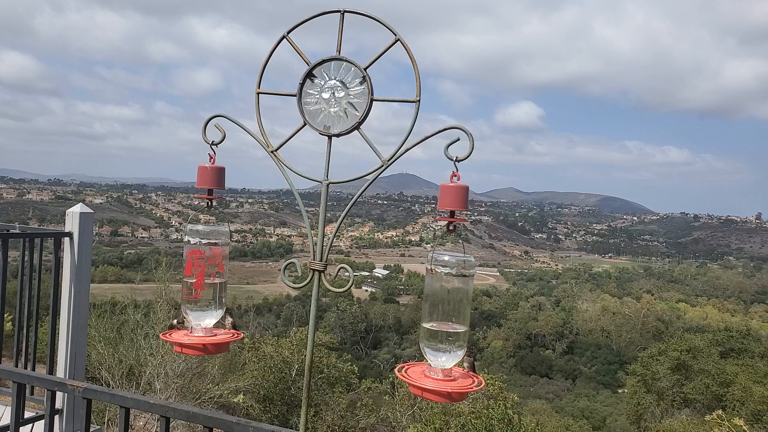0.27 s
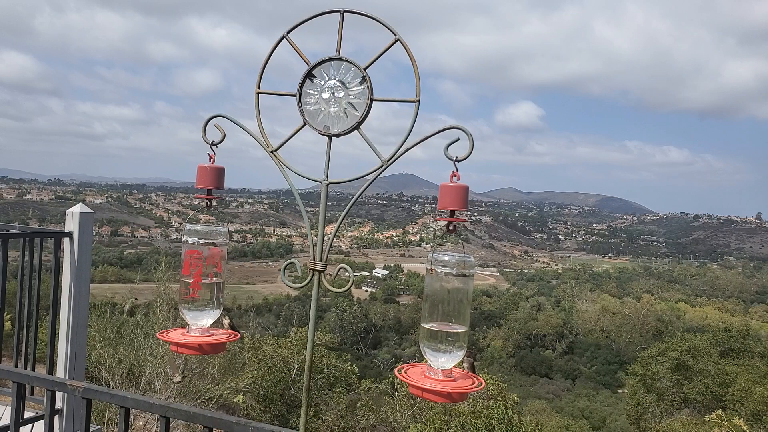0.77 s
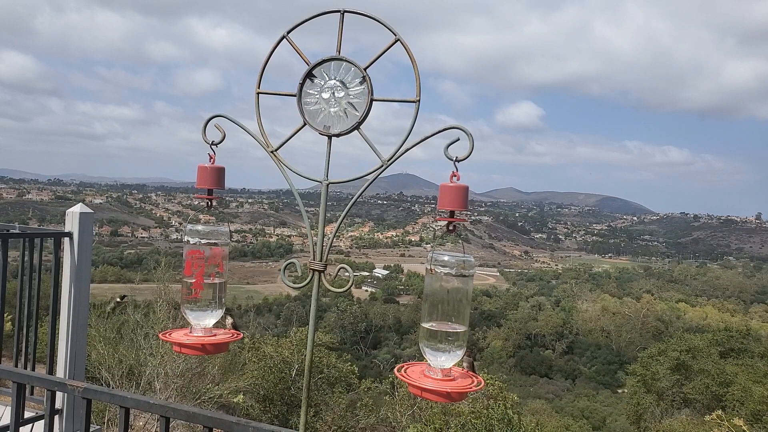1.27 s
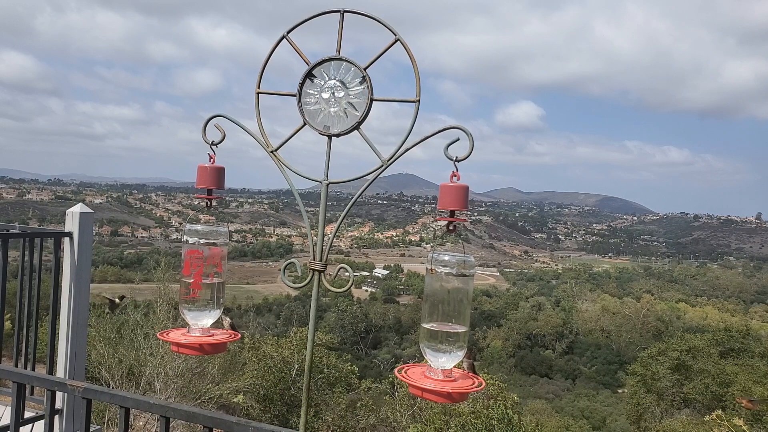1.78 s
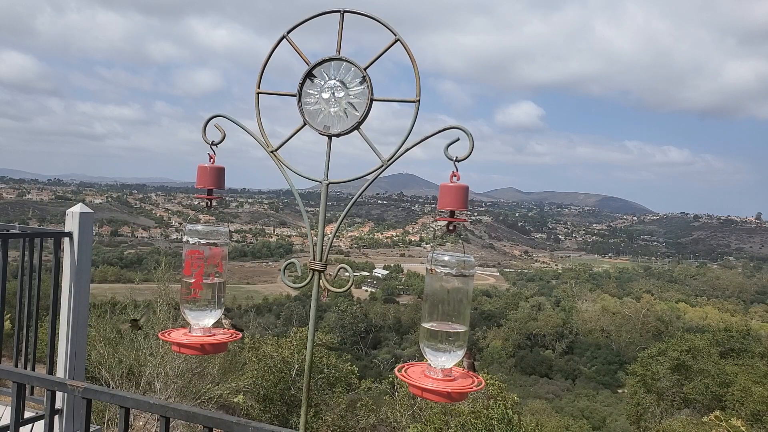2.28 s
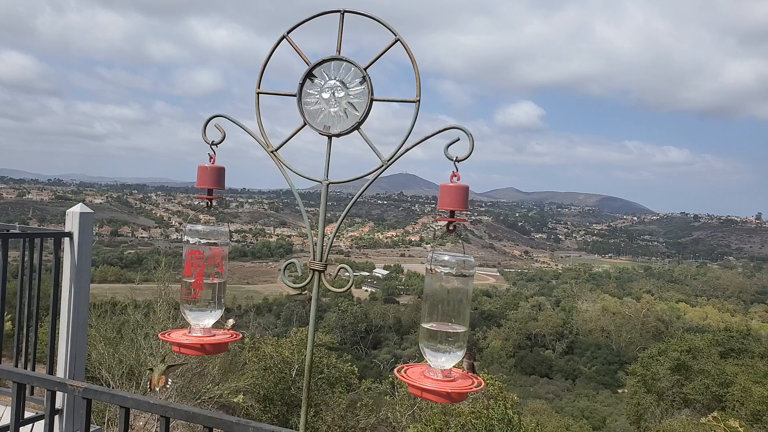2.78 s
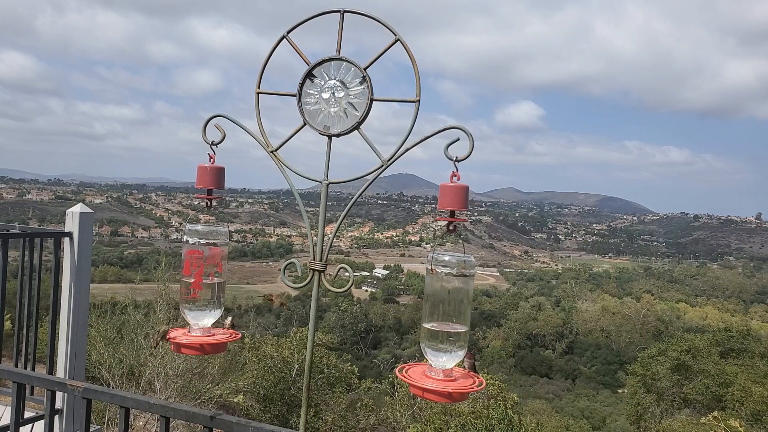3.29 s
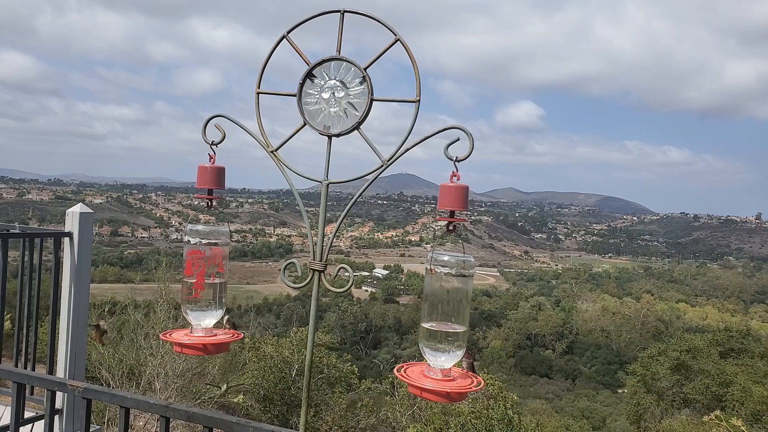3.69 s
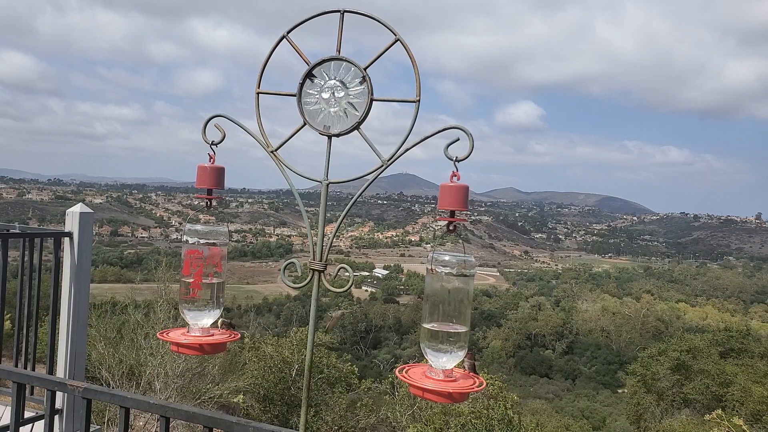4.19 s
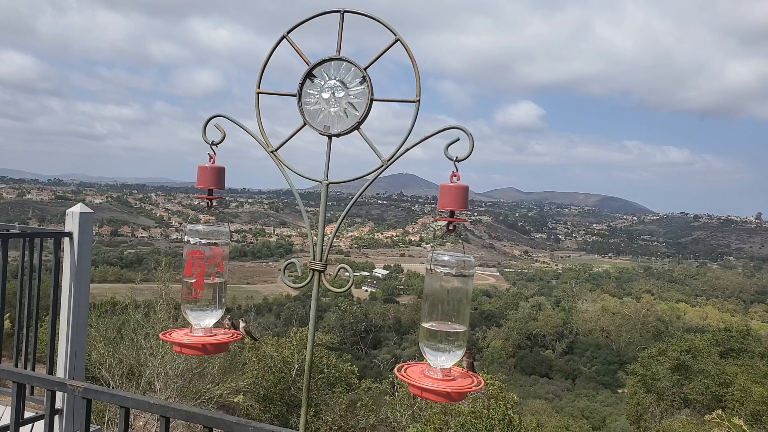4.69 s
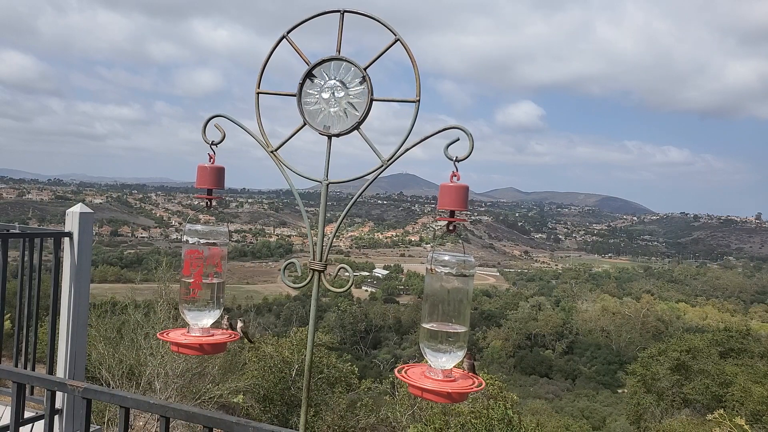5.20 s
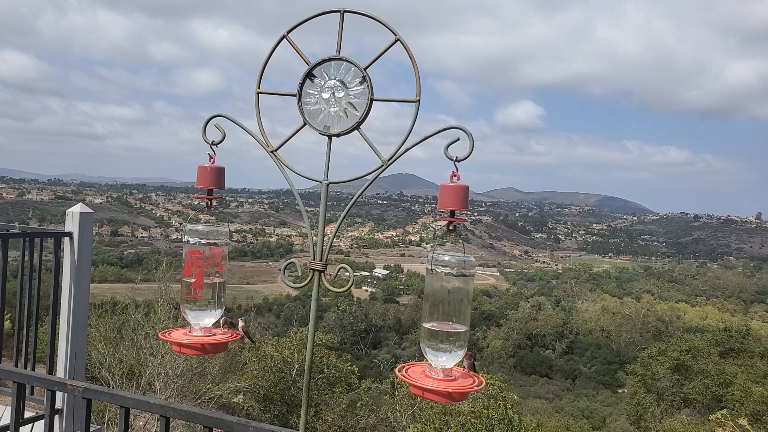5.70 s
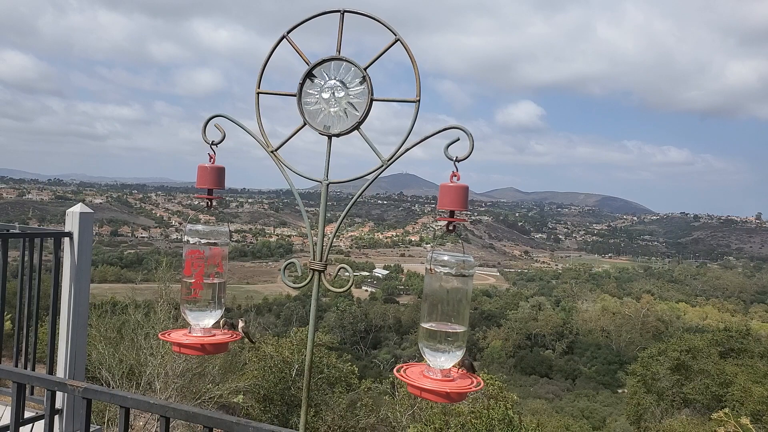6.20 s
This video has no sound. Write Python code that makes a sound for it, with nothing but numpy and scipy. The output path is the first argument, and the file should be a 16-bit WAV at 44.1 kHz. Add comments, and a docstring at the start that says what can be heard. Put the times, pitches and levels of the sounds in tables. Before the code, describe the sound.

Low wind gusts on the microphone while squabbling hummingbirds fly by with humming wings, dry chips, sharp ticks and short buzzy trills.

```python
"""Hummingbirds squabble at backyard feeders on a breezy hillside, near a small stereo microphone.
Wind rumbles on the ports over the hush of the valley, and a distant bird scolds. Chips break out ahead,
then wings hum past, their tips whistling, and wings and bills tick in a clash. One bird sings from the
right, its syrinx buzzing and trilling down into arched whistles. A last fly-by brings rasps and ticks."""
import sys
import numpy as np
from scipy import signal
from scipy.io import wavfile
from scipy.ndimage import uniform_filter1d

SR = 44100
rng = np.random.default_rng(int(sys.argv[2]) if len(sys.argv) > 2 else 0)


def generate_wav(signal):
    """Clip the signal to [-1, 1] and save it as 16-bit WAV at the path in sys.argv[1]."""
    frames = np.transpose(np.atleast_2d(signal))
    scaled = np.clip(frames, -1, 1) * 32767
    pcm = np.round(scaled).astype(np.int16)
    wavfile.write(sys.argv[1], SR, pcm)


N = 284004


def syrinx(hz, level_db, fall_db=4.0, breath_db=-28.0, second_db=0, waver=0.14):
    """The bird's voice: overtones of one wavering pitch, fall_db weaker at each step, plus breath."""
    attack_s, release_s = .0035, .0029
    hz = hz * (1 + waver * uniform_filter1d(rng.standard_normal(len(hz)), 30))
    phase = 2 * np.pi * np.cumsum(hz) / SR
    tone = sum(gain_of(-fall_db * k + second_db * (k == 1)) * np.sin((k + 1) * phase)
               * ((k + 1) * hz < SR / 2) for k in range(8))
    breath = gain_of(breath_db) * rng.standard_normal(len(hz))
    t = np.arange(len(hz)) / SR
    edges = np.sin(np.pi / 2 * np.clip(np.minimum(t / attack_s, t[::-1] / release_s), 0, 1)) ** 2
    return gain_of(level_db) * (tone + breath) * edges


def trill(track, contour, per_s, lead):
    """Adds a note whose pitch dives once a cycle; lead is the share of a cycle before the first dip."""
    times, *columns = np.transpose(contour)
    t = np.arange(times[0], times[-1], 1 / SR)
    top_hz, db, depth_hz = (np.interp(t, times, column) for column in columns)
    top_hz = uniform_filter1d(top_hz, round(.004 * SR), mode="nearest")  # 4 ms glide
    cycles = per_s * (t - times[0]) - lead
    dip = np.cos(np.pi * cycles) ** 2
    # shallow trills throb in level; deep ones are breathy and unsteady
    throb = np.clip(1.6 - depth_hz / 1200, .35, 1) * np.clip(depth_hz / 300, 0, 1)
    choke_db = 1500 / per_s * throb * np.cos(np.pi * (cycles + 0.3)) ** 2
    note = syrinx(top_hz - depth_hz * dip ** 1.6, db - choke_db, breath_db=-31 + depth_hz / 180,
                  waver=.095 + .05 * np.clip(depth_hz / 800, 0, 1))
    add(track, times[0], note)


def trills(ahead, right):
    """A small falling trill ahead; later the song opens on the right, with a thin voice above it."""
    # note contours (time [s], top pitch [Hz], level [dB], dip depth [Hz])
    small = [(1.957, 6070, -61, 1500), (1.968, 5500, -56, 1820), (1.98, 4720, -50, 1510)]
    high_voice = [(4.352, 8900, -51, 500), (4.37, 8620, -46, 397), (4.39, 8660, -80, 400)]
    opening = [(4.363, 7010, -55, 600), (4.374, 6910, -39.5, 603), (4.384, 6700, -71, 606),
               (4.392, 6920, -39, 807), (4.409, 7140, -37, 1083), (4.456, 7090, -39, 1098),
               (4.461, 5150, -37, 3), (4.467, 3120, -49.5, -3), (4.474, 1900, -49, 0)]
    trill(ahead, small, per_s=180, lead=0.24)
    for contour in (high_voice, opening):
        trill(right, contour, per_s=140, lead=0.31)


def buzzes(track):
    """Trills with pitch dips so deep that they buzz."""
    # buzz cues (time [s], length [s], dip rate [Hz], level [dB])
    cues = [(4.692, 0.048, 134, -31), (5.015, 0.061, 134, -33.5), (5.423, 0.054, 134, -32.5)]
    # contour of each buzz (position [share of length], top pitch [Hz], level offset [dB], dip depth [Hz])
    shape = [(0, 4630, -5, 1438), (.07, 6890, -4, 1460), (.16, 7010, 0.5, 1993), (.8, 6830, -2, 2750),
             (1, 5810, -25, 2670)]
    for s, length, per_s, db in cues:
        contour = [(s + u * length, hz, db + offset, depth) for u, hz, offset, depth in shape]
        trill(track, contour, per_s, lead=-0.14)


def trilled_whistles(track):
    """A fast trill drops into a whistle that settles, arches and falls."""
    # notes (time [s], trill length [s], trill level [dB], whistle length [s], whistle entry [dB],
    # arch position [share of whistle], arch pitch [Hz], end pitch [Hz])
    notes = [(4.783, 0.017, -33, 0.046, -43.5, 0.6, 2265, 1820),
             (5.125, 0.019, -32.5, 0.06, -51, 0.44, 2117, 1833),
             (5.525, .021, -31.5, 0.065, -52.5, 0.28, 2190, 1810)]
    depth_hz, drop_s, arch_db, tail_db = 893, .0105, -41, -47
    for s, trill_s, db, whistle_s, entry_db, arch, arch_hz, end_hz in notes:
        land = s + trill_s + drop_s
        contour = [(s, 7010, db - 4, depth_hz),
                   (s + trill_s, 6300, db, depth_hz),
                   (land, 2215, entry_db, 0),
                   (land + .51 * arch * whistle_s, 2060, (entry_db + arch_db) / 2, 0),
                   (land + arch * whistle_s, arch_hz, arch_db, 0),
                   (land + whistle_s, end_hz, tail_db, 0)]
        trill(track, contour, per_s=255.4, lead=0.73)


def chips(ahead, right):
    """Short, breathy calls that fall in pitch as they fade."""
    # chips (time [s], length [s], start pitch [Hz], end pitch [Hz], level [dB], side [0 ahead, 1 right])
    cues = [ (1.426, 0.031, 2060, 1620, -54.5, 0), (1.87, 0.024, 2090, 1620, -46, 0),
            (1.981, 0.028, 2100, 1680, -47, 0), (2.048, 0.021, 3260, 1450, -44.5, 0),
            (2.112, 0.021, 3360, 1370, -45.5, 0), (2.175, 0.032, 3180, 1396, -44, 0),
            (2.245, 0.029, 2030, 1640, -47.5, 0), (3.17, 0.028, 2050, 1580, -46.5, 0),
            (3.521, 0.032, 2000, 1496, -49.5, 0), (4.402, 0.0195, 1930, 1610, -45, 0),
            (4.531, 0.029, 2040, 1665, -49, 1), (4.926, 0.017, 2075, 1780, -46.5, 1),
            (5.277, 0.016, 2225, 1750, -42, 1)]
    # steep pitch dives (time [s], length [s], bend position [share of length], level [dB])
    dives = [(4.633, .023, 0.59, -39), (5.377, 0.013, .33, -38.5)]
    knee_hz, plunge_s, fade_db = 2250, .0026, -6
    for s, length, start_hz, end_hz, db, side in cues:
        u = np.linspace(0, 1, round(length * SR))
        glide = end_hz + (min(start_hz, knee_hz) - end_hz) * (1 - u)
        plunge = max(start_hz - knee_hz, 0) * np.exp(-u * length / plunge_s)
        chip = syrinx(glide + plunge, db + fade_db * u, fall_db=5.0, breath_db=-17.0,
                      second_db=-1 if side else -11, waver=0.18)
        add(right if side else ahead, s, chip)
    for s, length, bend, db in dives:
        u = np.linspace(0, 1, round(length * SR))
        hz = np.interp(u, [0, bend, 1], [4650, 3900, 1940])
        add(right, s, syrinx(hz, db + fade_db * u, fall_db=3.0, breath_db=-12.0))


def flicks(track):
    """Nine quick upward chirps in a run that slows, swelling and fading."""
    start_s, gap_s, slowing_s, peak_db = 1.819, .0117, .0002, -44
    hz = np.linspace(2900, 6800, round(.005 * SR))
    for k in range(9):
        flick = syrinx(hz, peak_db - .4 * (k - 3.3) ** 2, fall_db=3.5)
        add(track, start_s + k * gap_s + slowing_s * k ** 2, flick)


def rasps(ahead, right):
    """Harsh calls: the pitch loses hold and the breathy voice pulses 220 times a second."""
    # rasps (time [s], length [s], level [dB], centre pitch [Hz], side [0 ahead, 1 right])
    cues = [(1.838, 0.12, -62.5, 6300, 0), (3.805, 0.067, -58, 4080, 0), (6.131, 0.055, -50, 5100, 1),
            (6.167, 0.15, -53, 4200, 1)]
    for s, length, db, centre_hz, side in cues:
        t = np.arange(round(length * SR)) / SR
        hz = centre_hz + 900 * wobble(len(t), 40)
        pulses = 1.75 + np.cos(np.pi * 220 * t) ** 2
        add(right if side else ahead, s, pulses * syrinx(hz, db - 130 * t, fall_db=33.0, breath_db=-6.0))


def calls():
    """The near voices, coloured by throat, bill and microphone, on two tracks: ahead and right."""
    # EQ of throat, bill and microphone (frequency [Hz], gain [dB])
    bill_eq = [(1200, -13), (2100, -13.5), (3100, -4.5), (4100, -4.5), (5300, -2), (6400, 7), (7000, 1),
               (7500, -2.5), (10300, 2.5), (11800, -3.5), (13000, -5.5), (16000, -9)]
    # extra EQ for the birds ahead, bills turned the other way (frequency [Hz], gain [dB])
    turned_eq = [(2000, 4.5), (3900, 7.5), (5500, 2), (7500, 2), (12500, -3.5), (15000, 4)]
    tracks = np.zeros((2, N))
    ahead, right = tracks
    trills(ahead, right)
    buzzes(right)
    trilled_whistles(right)
    chips(ahead, right)
    flicks(ahead)
    rasps(ahead, right)
    ahead, right = coloured(tracks, bill_eq)
    return coloured(ahead[None], turned_eq)[0], right


def wings():
    """Each wingbeat pushes a puff of air: a low, unsteady hum and a rush that swells with the stroke."""
    # fly-bys and hovers (start [s], nearest [s], end [s], first beat rate [Hz], last beat rate [Hz],
    # hum level [dB], rush level [dB])
    flights = [(2.222, 2.443, 2.67, 46, 63, -43, -51.5), (2.661, 2.944, 2.94, 59, 69, -54, -87),
               (3.641, 3.82, 4.25, 70.6, 51, -47.5, -51.5), (4.161, 4.29, 4.73, 51.4, 60.6, -47, -64.5),
               (5.869, 6.06, 6.5, 66, 62.6, -50.5, -56.5)]
    # air through feathers (frequency [Hz], gain [dB])
    rush_eq = [(600, 10), (1900, -3.5), (3100, -9), (4500, -0.5), (7500, -12.5), (16000, -18)]
    hum_far_db, rush_far_db = -14.5, -7
    hums, rushes = np.zeros(N), np.zeros((2, N))
    for start, nearest, end, first_hz, last_hz, hum_db, rush_db in flights:
        t = np.arange(start, end, 1 / SR)
        far = np.interp(t, [start, nearest, end], [1, 0, 1]) ** 2
        beat_hz = np.linspace(first_hz, last_hz, len(t)) * (1 + .012 * wobble(len(t), 900))
        phase = 2 * np.pi * np.cumsum(beat_hz) / SR
        fade = signal.windows.tukey(len(t), .15)
        flutter = unit_rms(uniform_filter1d(uniform_filter1d(rng.standard_normal((11, len(t))), 500), 500))
        hum = sum(gain_of(-2.4 * k - 2 * (k % 2) + 1.5 * flutter[-k])
                  * np.cos(k * phase + .05 * k * flutter[k]) for k in range(2, 11))
        add(hums, start, gain_of(hum_db + hum_far_db * far) * unit_rms(hum) * fade)
        swell = gain_of(rush_db + rush_far_db * far) * np.exp(0.21 * np.cos(phase)) * fade
        shared, *own = rng.standard_normal((3, len(t)))
        for port, air in zip(rushes, own):
            add(port, start, swell * unit_rms(air + 0.19 * shared))
    return hums, coloured(rushes, rush_eq)


def wing_tips():
    """Wing tips whistle a pip on each beat, and a weaker one on the way back."""
    # the stronger pip of each beat (time [s], level [dB])
    beats = [(2.2702, -44), (2.2955, -48), (2.3133, -49), (2.3305, -45), (2.347, -45), (2.3639, -50),
             (2.374, -42), (2.3914, -49), (2.4089, -46), (2.4265, -46), (2.4446, -50), (2.4629, -55),
             (2.4997, -53), (2.5186, -67)]
    pip_hz, width_s, backstroke_s, backstroke_db = 4450, .0011, .0079, -10
    out, t = np.zeros(N), np.arange(500) / SR
    envelope = np.exp(-((t - 2 * width_s) / width_s) ** 2)
    for s, db in beats:
        for delay_s, offset_db in ((0, 0), (backstroke_s, backstroke_db)):
            detune, spread = rng.standard_normal(2)
            pip = np.sin(2 * np.pi * pip_hz * (1 + .02 * detune) * t) * envelope
            add(out, s + delay_s, gain_of(db + offset_db * (1 + .4 * spread)) * pip)
    return out


def knocks():
    """Wings and bills snap and crack: a track from the right, and a stereo pair for clashes in front."""
    # hits (time [s], snap drive [dB], crack drive [dB], right port lag [samples]);
    # a negative lag only marks a hit from the right
    hits = [(3.9059, -28.5, -27, 8), (3.9395, -36, -38, 7), (3.956, -39, -35, 4.5), (3.9752, -39, -27, 7),
            (3.9922, -39.5, -26, 5.5), (4.0098, -48, -25, 4), (4.0279, -37, -26.5, 2.5),
            (4.085, -50.5, -62, -1.5), (6.0285, -51, -39, -3), (6.195, -56, -32.5, -3.5),
            (6.214, -57, -31.5, 3), (6.287, -49, -38, -3), (6.337, -45, -34.5, -1.5),
            (6.357, -50, -33.5, -2)]
    hollow = signal.butter(2, [1250, 3000], "band", fs=SR)
    bright = signal.butter(1, [3000, 10000], "band", fs=SR)
    right, front, t = np.zeros(N), np.zeros((2, N)), np.arange(500) / SR
    for s, snap_db, crack_db, lag in hits:
        snap, crack = rng.standard_normal((2, len(t)))
        snap *= gain_of(snap_db - 60 * t / 0.007)
        crack *= gain_of(crack_db - 60 * t / 0.015) * np.minimum(t / 0.00089, 1)
        knock = signal.lfilter(*bright, snap) + signal.lfilter(*hollow, crack)
        if lag < 0:
            add(right, s, knock)
        else:
            add(front[0], s, knock)
            add(front[1], s + lag / SR, knock)
    return right, front


def far_birds():
    """Short sliding whistles and hoarse scolds, blurred by distance."""
    # whistles (time [s], length [s], start pitch [Hz], end pitch [Hz], level [dB])
    whistles = [(1.438, 0.058, 4370, 4380, -64), (4.177, 0.042, 7000, 6400, -68)]
    # scolds (time [s], centre pitch [Hz], level [dB])
    scolds = [(.28, 3900, -69), (.45, 3950, -68), (0.669, 4400, -64), (0.842, 3900, -65.5),
              (1.05, 4500, -65.5), (1.101, 3900, -66.5)]
    out = np.zeros(N)
    for s, length, start_hz, end_hz, db in whistles:
        n = round(length * SR)
        blur = .4 + wobble(n, 110)
        tone = np.sin(2 * np.pi * np.cumsum(np.linspace(start_hz, end_hz, n)) / SR)
        add(out, s, gain_of(db) * blur * tone * np.hanning(n))
    hiss_band, n = signal.butter(2, [4200, 7000], "band", fs=SR), round(.08 * SR)
    for s, centre_hz, db in scolds:
        hz = centre_hz + 120 * wobble(n, 120)
        hoarse = wobble(n, 90) * np.sin(2 * np.pi * np.cumsum(hz) / SR)
        hiss = gain_of(-7) * unit_rms(signal.lfilter(*hiss_band, rng.standard_normal(n)))
        add(out, s, gain_of(db) * (hoarse + hiss) * np.hanning(n))
    return out


def breeze():
    """Wind buffets each port unevenly, over a low wash that lifts with the gusts and a treble rustle."""
    # gusts (time [s], level [dB])
    gusts = [(0, -42), (.41, -50.5), (.61, -29), (.72, -44), (.88, -40.5), (.95, -59.5), (1.15, -39.5),
             (1.23, -55), (1.38, -60), (1.6, -50.5), (2.36, -43.5), (2.8, -49), (3.0, -45), (3.6, -49),
             (4.54, -42), (4.63, -42.5), (4.7, -31), (4.77, -42), (5.05, -40), (5.27, -45.5), (5.6, -43.5),
             (6.44, -38.5)]
    # wind balance (time [s], left over right [dB])
    balance = [(0, -6), (.6, -8), (2.3, 3), (4.4, -2.5), (4.6, 8), (5.2, -0.5), (6.44, 6)]
    # valley hush (time [s], wash level [dB], rustle level [dB])
    hush = [(0.0, -59.5, -61.5), (3.66, -51.5, -64), (3.84, -50, -59.5), (5.36, -54.5, -58),
            (5.74, -52, -61), (6.44, -53.5, -53.5)]
    # spectra of port rumble, wash and rustle (frequency [Hz], density [dB])
    rumble_eq = [(11, -62), (18, -16), (65, 5), (83, 2.5), (180, -21), (230, -41)]
    wash_eq = [(71, -13.5), (120, -5.5), (204, -4.5), (363, -12.5), (1300, -27), (1690, -83)]
    rustle_eq = [(590, 0), (1000, -8), (1890, -9), (3010, -17.5), (3620, -15.5), (5250, -15.5), (6330, -13),
                 (8260, -22), (16000, -28)]
    # stereo image of the hush (frequency [Hz], left-right correlation [-1 to 1])
    image = [(60, 1), (380, 0.4), (2380, -0.26), (15000, 0.16)]
    t = np.arange(N) / SR
    gusts_db = np.interp(t, *np.transpose(gusts))
    pan = gain_of(np.outer([.5, -.5], np.interp(t, *np.transpose(balance))))
    rumble = stereo_noise(rumble_eq, size=4096, patchy_db=2.5, likeness=lambda hz: 0.37 + hz / 300)
    rumble /= np.sqrt(uniform_filter1d(rumble ** 2, 6000)) ** .6  # steadied, so the gusts set the swells
    rumble *= gain_of(gusts_db) * pan / np.sqrt((pan ** 2).mean(0))
    times, wash_db, rustle_db = np.transpose(hush)
    wash = stereo_noise(wash_eq, size=1024, patchy_db=3.0, likeness=lambda hz: curve_at(image, hz))
    wash *= gain_of(0.33 * (gusts_db + 45.5) + np.interp(t, times, wash_db))
    rustle = stereo_noise(rustle_eq, size=256, patchy_db=1.5, likeness=lambda hz: curve_at(image, hz))
    return rumble + wash + rustle * gain_of(np.interp(t, times, rustle_db))


def patio(x, near_t60=0.086, far_t60=0.48):
    """Feeder and railing scatter back at once; the wall and ground add a fainter, longer tail."""
    taps = np.zeros((2, 12000))
    at = np.arange(40, 11960, 20) + rng.integers(0, 20, (2, 596))
    decay = gain_of(-60 * at / SR / near_t60) + gain_of(-24.0 - 60 * at / SR / far_t60)
    np.put_along_axis(taps, at, rng.choice([-1., 1.], at.shape) * decay, 1)
    return signal.oaconvolve(x[None], taps / np.linalg.norm(taps[0]), axes=1)[:, :N]


def stereo_noise(spectrum, size, patchy_db, likeness):
    """A stereo noise bed of random short-time spectra with drifting patches, rms 1."""
    frames, hz = 4 * N // size + 5, np.fft.rfftfreq(size, 1 / SR)
    a, b, c, d, patches = rng.standard_normal((frames, len(hz), 5)).T
    patches = unit_rms(uniform_filter1d(uniform_filter1d(patches, 9, 0), 9, 1))
    shared = np.clip(likeness(hz), -1, 1)[:, None]
    left = a + 1j * b
    right = shared * left + np.sqrt(1 - shared ** 2) * (c + 1j * d)
    shape_db = curve_at(spectrum + [(1.3 * spectrum[-1][0], -90)], hz)[:, None]
    spectra = np.array([left, right]) * gain_of(shape_db + patchy_db * patches)
    return unit_rms(signal.istft(spectra, nperseg=size, noverlap=size - size // 4)[1][:, :N])


def coloured(x, eq):
    """Applies an EQ curve as a smooth filter."""
    hz = np.linspace(0, SR / 2, 513)
    return signal.oaconvolve(x, signal.firwin2(401, hz, gain_of(curve_at(eq, hz)), fs=SR)[None], "same")


def curve_at(points, hz):
    f, value = np.transpose(points)
    return np.interp(np.log(hz + 1), np.log(f + 1), value)


def wobble(n, smoothing):
    return unit_rms(uniform_filter1d(rng.standard_normal(n), smoothing))


def gain_of(db):
    return 10 ** (np.asarray(db) / 20)


def unit_rms(x):
    return x / np.sqrt(np.mean(x ** 2) + 1e-20)


def add(mix, s, sound):
    part = mix[round(s * SR):][:len(sound)]
    part += sound[:len(part)]


def scene():
    """Places the birds ahead and to the right of the two ports, with patio reverb and the breeze."""
    # shadow on the left port for sound from the right (frequency [Hz], gain [dB])
    shadow_eq = [(2000, 0), (4000, -7.5), (6300, -10.5)]
    # lean of sound from ahead (frequency [Hz], left over right [dB])
    lean_eq = [(2000, 2), (4000, -1), (6300, -0.5), (12000, 6)]
    ahead_lag, right_lag = 8, 21  # samples between the ports
    ahead, right = calls()
    pips = wing_tips()
    right_knocks, front_knocks = knocks()
    hum, rush = wings()
    ahead = ahead + far_birds()
    send = ahead + gain_of(4) * right + gain_of(-5) * (pips + right_knocks + front_knocks[0])
    reverb = gain_of([[-8], [-9]]) * patio(send)
    ahead, right = ahead + pips, right + right_knocks
    slightly_left = np.array([coloured(ahead[None], lean_eq)[0] + hum, np.roll(ahead + hum, ahead_lag)])
    shadowed = coloured(np.roll(right, right_lag)[None], shadow_eq)[0]
    from_right = gain_of(4.5) * np.array([shadowed, right])
    return slightly_left + from_right + front_knocks + rush + reverb + breeze()


def record(dry):
    """A steep low-pass at 16 kHz."""
    return signal.oaconvolve(dry, signal.firwin(511, 16000, window=("kaiser", 9), fs=SR)[None], "same")


dry = scene()
out = record(dry)
generate_wav(out)
```